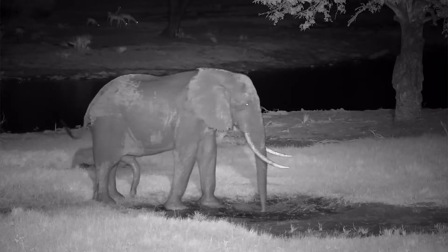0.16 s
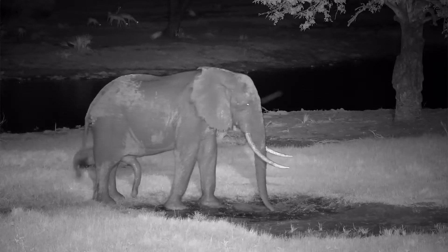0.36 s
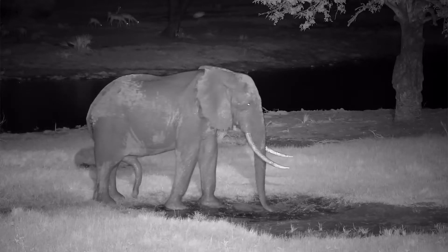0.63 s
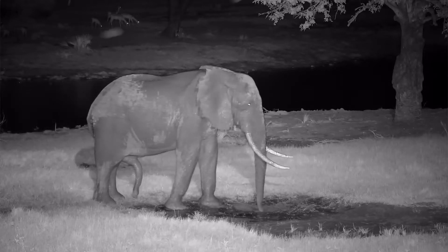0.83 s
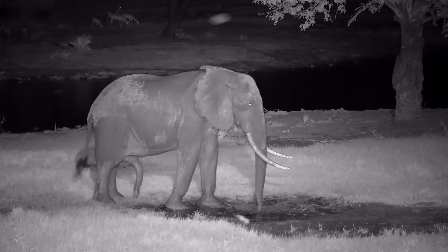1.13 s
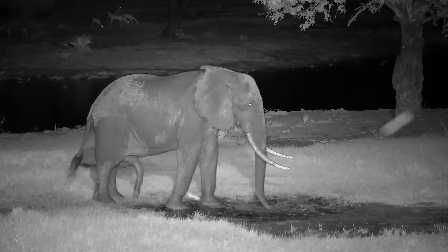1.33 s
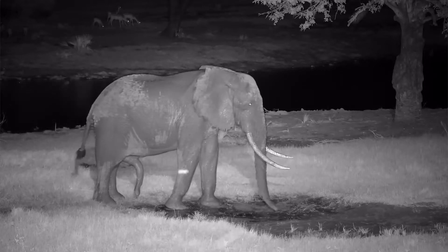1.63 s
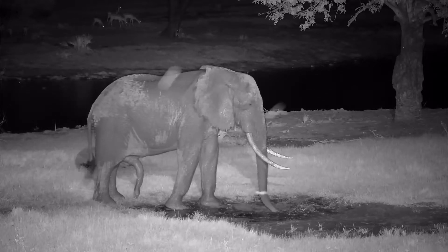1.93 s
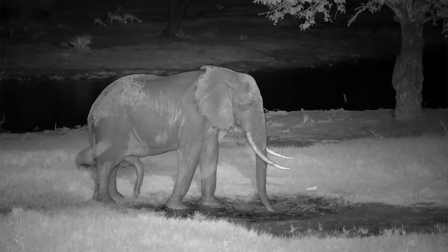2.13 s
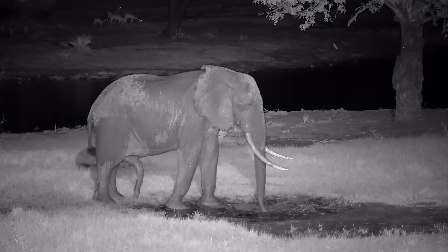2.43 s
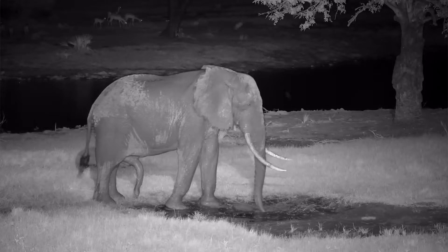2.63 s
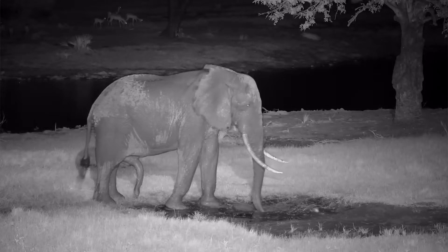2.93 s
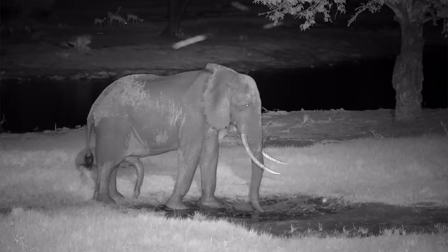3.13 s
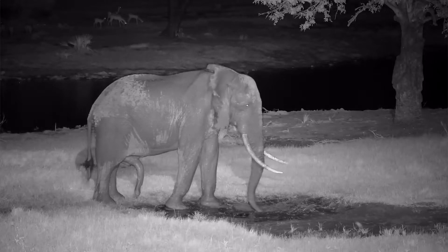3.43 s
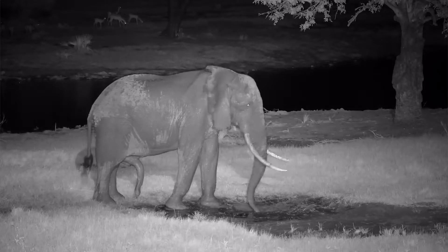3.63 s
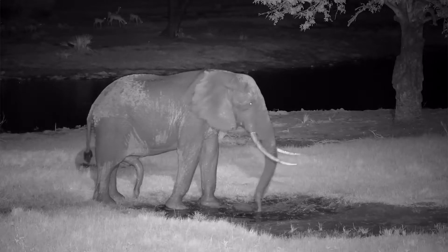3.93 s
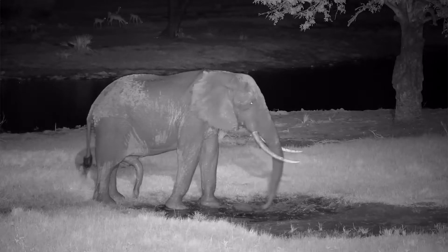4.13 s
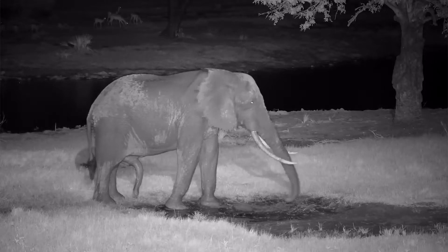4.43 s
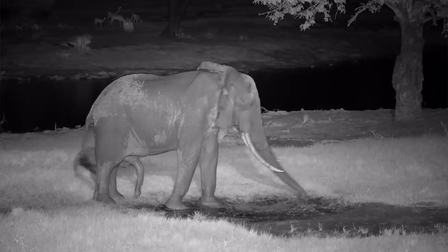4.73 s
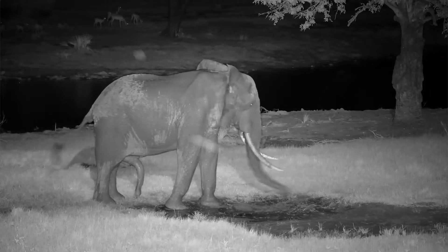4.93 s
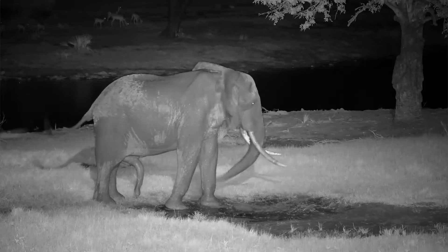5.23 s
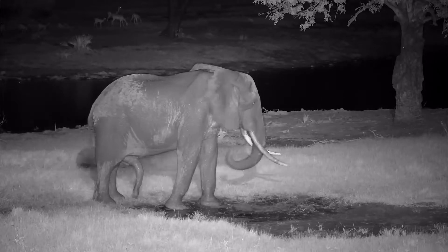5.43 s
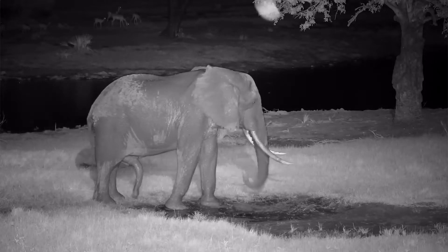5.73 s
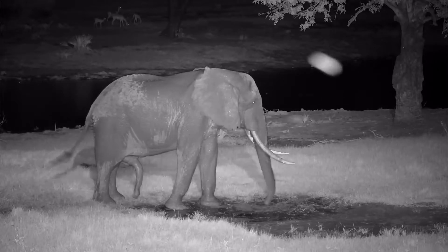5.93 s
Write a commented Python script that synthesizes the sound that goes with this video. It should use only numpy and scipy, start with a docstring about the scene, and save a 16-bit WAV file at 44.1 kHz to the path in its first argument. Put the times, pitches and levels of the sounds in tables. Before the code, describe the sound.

Outdoors at night by a waterhole, a thick frog chorus runs without pause. Near bubbling frogs pop in rapid, throbbing upward boips, mixed with slower smooth slides, sharp ringing ticks and a short pure rising whistle nearly every second. Soft toad trills come and go. Distant frogs and crickets shimmer above. An elephant's quiet fluttering breaths pass underneath, with a small dull knock late. Thin bass; the loudest overlaps clip.

```python
"""Frog chorus at a night waterhole

A warm night at the water's edge. Bubbling frogs pop throbbing, rising 'boips' and slower smooth slides;
reed frogs whistle and tick in sine notes; toads trill in trains of soft pulses. Crowds of short notes make
far frogs, with crickets above them, and shaped noise makes the night air. A large animal nearby blows and
snuffles in fluttering noise, with one dull knock. The loudest overlaps clip."""
import sys
import numpy as np
from scipy import signal
from scipy.fft import rfft, irfft
from scipy.io import wavfile

SR = 44100
rng = np.random.default_rng(int(sys.argv[2]) if len(sys.argv) > 2 else 0)


def boost_factor(decibels):
    """Convert a level in decibels to a linear amplitude factor."""
    exponent = np.asarray(decibels, float) / 20
    return 10 ** exponent


def wav_out(sig):
    """Save sig, one row per channel (or a flat mono array), as 16-bit PCM at SR to the path in sys.argv[1]."""
    wavfile.write(sys.argv[1], SR, np.round(np.clip(np.atleast_2d(sig).T, -1, 1) * 32767).astype(np.int16))


N = 268128
T = np.arange(N) / SR  # time [s]

# Colour of the night air: (frequency [Hz], relative level [dB])
NIGHT_COLOUR = [(100, -60.5), (400, -29), (700, -20), (1100, -6.5), (2200, -6), (3200, 2), (4500, -15),
                (5700, -0.5), (6800, -21), (7600, -33), (8200, -38), (12300, -45.5), (12700, -95.5)]
# Slow swell of both choruses: (time [s], far frog level [dB], cricket level [dB])
CHORUS_SWELL = [(0, -25, -25), (.65, -27.5, -27), (1.1, -23.5, -25), (1.9, -26.5, -24), (2.5, -24, -23.5),
                (3.2, -23.5, -24.5), (3.8, -24, -23.5), (4.3, -24.5, -23), (4.75, -22, -23),
                (5.1, -24.5, -22.5), (5.35, -23.5, -24.5), (5.6, -25, -22.5), (6.08, -25, -25.5)]
# Loudness of far frog voices across their band: (frequency [Hz], relative level [dB])
FAR_FROG_BAND = [(2550, -30), (2800, -4), (3150, -1), (3500, -2), (3900, -13.5), (4300, -16)]
# Loudness of crickets across their band: (frequency [Hz], relative level [dB])
CRICKET_BAND = [(4900, -6), (5200, -7), (5600, 2.5), (6100, 0), (6500, -8.5), (7000, -21), (7600, -21.5)]
# How fast a crowd's loudness wanders: (rate [Hz], relative level [dB])
WAVER_COLOUR = [(2, 9.5), (8, 12.5), (18, 5.5), (40, -39.5), (120, -110)]
# Toad trills: (first pulse [s], last pulse [s], pulses [count])
TOAD_TRILLS = [(.02, .725, 26), (1.237, 2.29, 41), (2.09, 3.021, 38), (4.756, 5.702, 36)]
# The voice of each trill: (pitch [Hz], start level [dB], end level [dB])
TOAD_VOICES = [(1082, -23, -31), (1110, -30.5, -29.5), (1032, -32, -32), (1094, -23, -22)]
# Near bubbling frogs: (time near 1500 Hz [s], level [dB], rise [Hz/s])
NEAR_BOIPS = [(.143, -17, 78400), (.193, -20.5, 76500), (.233, -13.5, 85000), (.247, -20.5, 85500),
              (.262, -10, 86700), (.463, -16, 58200), (.543, -22, 71300), (.553, -14.5, 82600),
              (.64, -28.5, 70400), (.835, -34.5, 70000), (.873, -14.5, 85000), (.925, -16, 79000),
              (.955, -22, 86500), (.973, -36, 87000), (.981, -7, 86400), (.995, -10.5, 89700),
              (1.087, -21, 87500), (1.096, -21, 83000), (1.181, -11, 72000), (1.192, -24.5, 67000),
              (1.315, -30.5, 71000), (1.493, -19.5, 70000), (1.525, -16.5, 89000), (1.573, -18, 74000),
              (1.622, -15.5, 90500), (1.652, -17.5, 84000), (1.786, -21, 58300), (1.795, -9, 62600),
              (1.818, -12.5, 93000), (1.829, -15, 84400), (1.943, -18, 69000), (1.965, -23, 86000),
              (1.98, -15.5, 90000), (2.028, -24.5, 80500), (2.11, -27.5, 69000), (2.14, -30, 68600),
              (2.228, -17.5, 72500), (2.235, -27.5, 70500), (2.395, -15.5, 88500), (2.407, -20, 84500),
              (2.418, -13.5, 82300), (2.43, -15.5, 63400), (2.496, -25.5, 85500), (2.511, -24, 81500),
              (2.523, -19, 78500), (2.568, -18.5, 53100), (2.58, -26.5, 76000), (2.62, -26.5, 71500),
              (2.765, -22.5, 64800), (2.92, -17, 70000), (2.948, -11.5, 84200), (3.109, -27, 69000),
              (3.136, -17, 68700), (3.15, -15.5, 79500), (3.218, -16, 86000), (3.277, -31.5, 70400),
              (3.316, -27, 68000), (3.369, -15, 75600), (3.453, -18, 87600), (3.481, -9, 80000),
              (3.608, -20, 85500), (3.692, -24, 87000), (3.73, -19, 66000), (3.806, -23, 86000),
              (3.814, -19, 85400), (3.946, -22.5, 84500), (3.989, -17, 68700), (4, -18, 81000),
              (4.009, -13, 91000), (4.095, -23, 91000), (4.155, -28.5, 67500), (4.205, -18.5, 83000),
              (4.227, -15.5, 89000), (4.285, -16.5, 75000), (4.341, -17, 88000), (4.452, -25.5, 69000),
              (4.495, -10.5, 92000), (4.529, -14, 85000), (4.553, -24.5, 86000), (4.594, -17.5, 87000),
              (4.653, -21.5, 91000), (4.774, -17, 75400), (4.81, -13, 80700), (4.831, -22, 56300),
              (4.899, -16.5, 79000), (4.975, -16.5, 87500), (4.985, -28, 86500), (5.121, -13, 77700),
              (5.187, -20.5, 86500), (5.2, -25, 76000), (5.214, -18.5, 86500), (5.241, -43, 85000),
              (5.252, -16, 85000), (5.403, -21.5, 79000), (5.412, -18, 77600), (5.483, -21.5, 88000),
              (5.617, -14, 84000), (5.686, -17, 89000), (5.711, -23, 74600), (5.73, -14, 85000),
              (5.853, -20.5, 67000), (5.987, -15, 88000), (6.037, -13.5, 84000), (6.053, -18.5, 85000)]
# Resonance of the sac in a boip: (frequency [Hz], gain [dB])
BOIP_RESONANCE = [(780, -2.5), (900, -8), (1300, -3), (1600, 0.5), (2100, 2), (2400, -3.5), (2800, -4.5)]
# Slower clean slides: (time near 1500 Hz [s], level [dB], rise [Hz/s])
SLIDE_CALLS = [(.031, -26, 20700), (.28, -17, 24350), (.38, -21.5, 24700), (1.407, -17.5, 25200),
               (1.768, -22, 24400), (2.863, -31.5, 22700), (3.079, -23.5, 18960), (3.19, -18, 24500),
               (3.514, -20, 27300), (4.034, -19, 25000), (4.712, -23, 26000), (5.048, -18.5, 24700),
               (5.165, -29, 21100), (5.51, -28.5, 25500), (5.584, -25, 25400), (5.83, -23, 23400)]
# Resonance of the sac in a slide: (frequency [Hz], gain [dB])
SLIDE_RESONANCE = [(850, -9.5), (1100, -6), (1300, -13.5), (1550, 2), (1900, -8), (2200, 0)]
# Reed frog ticks: (time [s], level [dB], pitch [Hz])
REED_TICKS = [(0.103, -9.5, 2700), (0.523, -18, 2840), (1.3836, -14, 2740), (1.4037, -9, 2710),
              (1.43, -13, 2656), (1.721, -19, 2790), (1.833, -5, 2797), (2.218, -20, 2680),
              (2.3506, -20, 2660), (2.9632, -11.5, 2790), (3.3897, -11, 2710), (3.6197, -20, 2720),
              (3.8387, -14.5, 2713), (4.1757, -16, 2690), (4.661, -13, 2770), (4.7646, -16, 2860),
              (4.822, -11.5, 2750), (4.901, -12.5, 2740), (5.2776, -16.5, 2820), (5.455, -14, 2740),
              (5.5428, -17.5, 2660), (5.679, -12.5, 2670)]
# Reed frog whistles: (time [s], level [dB], length [s])
REED_WHISTLES = [(0.2, -10.5, 0.077), (1.003, -8.5, 0.071), (1.872, -9.5, 0.068), (2.814, -10.5, 0.066),
                 (3.671, -6, 0.07), (4.429, -6.5, 0.064), (5.135, -9, 0.068)]
# The animal's blows and snuffles: (time [s], level [dB], attack [s], hold [s], fade [dB/s])
BLOWS = [(0.997, -40.5, 0.096, 0.037, 43), (2.1, -41.5, 0.58, .15, 35), (3.388, -36.5, 0.035, 0.6, 198),
         (3.551, -35.5, 0.069, 0.028, 149), (3.76, -35, .08, 0.053, 120), (5.312, -39, 0.057, .05, 86),
         (5.52, -48, .08, 0.1, 86)]
# Colour of the animal's breath: (frequency [Hz], relative level [dB])
BREATH_COLOUR = [(120, -61), (250, -24), (400, -15), (500, 1), (650, -2.5), (850, 5.5), (1100, -1),
                 (1800, -6.5), (4000, -47.5), (9000, -51.5), (12300, -55.5), (13000, -110)]
# The dull knock: (level [dB], pitch [Hz], 60 dB decay [s])
DULL_KNOCK = (-24, 800, .012)


def shape(hz, table):
    """Gain of a (frequency [Hz], level [dB]) table, joined on a log frequency axis."""
    f, db = np.transpose(table)
    return boost_factor(np.interp(np.log(np.maximum(hz, 1)), np.log(f), db))


def noise(table):
    """Noise of rms 1 with the given colour."""
    spectrum = rfft(rng.standard_normal(N))
    x = irfft(spectrum * shape(np.fft.rfftfreq(N, 1 / SR), table), N)
    return x / x.std()


def notes(start, hz, envelope):
    """Mixes many short sine notes; one row of pitch and envelope for each."""
    phase = 2 * np.pi * (np.cumsum(hz, axis=1) / SR + rng.random((len(start), 1)))
    at = (np.asarray(start) * SR).astype(int)[:, None] + np.arange(envelope.shape[1])
    inside = (at >= 0) & (at < N)
    return np.bincount(at[inside], (envelope * np.sin(phase))[inside], N)


def throb(t, hz, depth, spread):
    """Pulsing loudness, as of vocal cords opening in bursts; each note has its own rate."""
    chance = rng.random((len(t), 2))
    rate = hz * (1 + spread * (chance[:, :1] - .5))
    return 1 + np.clip(depth, 0, 1) * np.cos(2 * np.pi * (rate * t + chance[:, 1:]))


def scattered(x, echo_db):
    """The sound and its short blur from reeds and banks; a fresh random echo on each use."""
    t60_s = 0.045
    t = np.arange(int(.3 * SR)) / SR
    tail = rng.standard_normal(len(t)) * np.exp(-np.log(1000) * t / t60_s) * (t > .002)
    return x + boost_factor(echo_db) * signal.fftconvolve(x, tail / np.linalg.norm(tail))[:N]


def night_air():
    """A steady bed of shaped noise under the callers."""
    return boost_factor(-30) * noise(NIGHT_COLOUR)


def crowd(table, length, glide, pulse_hz, depth, scatter_db, count):
    """Many unseen callers: short pulsed notes at random moments, pitches spread over the band; rms 1."""
    chance = rng.random((count, 3))  # moment, pitch and loudness of each note
    lo, hi = table[0][0], table[-1][0]
    u = np.arange(0, length, 1 / SR) / length + 0 * chance[:, :1]
    hz = (lo + (hi - lo) * chance[:, 1:2]) * (1 + glide * (u - .5))
    size = boost_factor(scatter_db * chance[:, 2:3])
    envelope = size * shape(hz, table) * np.sin(np.pi * u) * throb(u * length, pulse_hz, depth, 0.32)
    x = notes(chance[:, 0] * (N / SR + length) - length, hz, envelope)
    return x / x.std()


def choruses():
    """Far frogs and crickets: each crowd swells slowly and wavers; the crickets also pulse to a shared beat."""
    beat_hz, beat_peak_s, beat_depth_db = 5.95, 2.0, 1
    frog_waver_db, cricket_waver_db = 1.5, 1.5  # rms
    s, frog_db, cricket_db = np.transpose(CHORUS_SWELL)
    far = crowd(FAR_FROG_BAND, .011, .06, 240, .7, 6., count=7000)
    crickets = crowd(CRICKET_BAND, .009, .02, 400, .7, 6., count=8000)
    beat_db = beat_depth_db * np.cos(2 * np.pi * beat_hz * (T - beat_peak_s))
    far_level_db = np.interp(T, s, frog_db) + frog_waver_db * noise(WAVER_COLOUR)
    cricket_level_db = np.interp(T, s, cricket_db) + beat_db + cricket_waver_db * noise(WAVER_COLOUR)
    return boost_factor(far_level_db) * far + boost_factor(cricket_level_db) * crickets


def toads():
    """Even trains of soft round pulses that settle up onto one pitch."""
    start_flat, wobble = 0.046, .006  # share of pitch: below the note at first, and pulse to pulse
    out, t = 0, np.arange(int(.04 * SR)) / SR
    pulse = np.exp(-.5 * ((t - t.mean()) / 0.0053) ** 2)
    for (first, last, pulses), (pitch_hz, start_db, end_db) in zip(TOAD_TRILLS, TOAD_VOICES):
        chance = rng.standard_normal((pulses, 2))
        index = np.arange(pulses)[:, None]
        db = np.linspace(start_db, end_db, pulses)[:, None] + 1.2 * chance[:, :1]
        db = db - 9 * np.exp(-index / 2.1)  # the trill swells over its first pulses
        hz = pitch_hz * (1 - start_flat * np.exp(-index / 4.5) + wobble * chance[:, 1:])
        out = out + notes(np.linspace(first, last, pulses) - t.mean(), hz + 0 * t, boost_factor(db) * pulse)
    return out


def sweeps(rows, low_hz, top_hz, tilt_db, sac, knees, lead, linger, pulse_depth, overtone_db):
    """An S-shaped rise: a pure note at the bottom, a throbbing climb, a fading plateau under the top."""
    s, db, rise = (np.array(rows)[:, [k]] for k in range(3))
    t = np.arange(-int(.06 * SR), int(.08 * SR)) / SR + 0 * s
    half, mid = (top_hz - low_hz) / 2, (top_hz + low_hz) / 2
    u = (1500 - mid + rise * t) / half
    knee = np.where(u < 0, *knees)  # one bend for the foot, one for the top; higher turns more sharply
    height = u / (1 + np.abs(u) ** knee) ** (1 / knee)
    hz = mid + half * height
    depth = pulse_depth * np.clip((hz - low_hz) / 400, 0, 1) * (0.5 + 0.52 * rng.random(s.shape))
    window = np.where(u < 0, np.exp(-np.abs(u / lead) ** 3.26), np.exp(-(u / linger) ** 4))
    pulses = throb(t, 241.0, depth, .1) ** 1.16 / 1.25
    envelope = boost_factor(db + tilt_db * height) * shape(hz, sac) * window * pulses
    start = s[:, 0] + t[:, 0]
    return notes(start, hz, envelope) + notes(start, 2 * hz, envelope * boost_factor(overtone_db))


def bubbling_frogs():
    """Fast throbbing boips, near and far, and slow smooth slides, from deep in several clumps of grass."""
    patches, echo_db = 6, -1  # clumps of grass, each with its own echo
    low_hz, top_hz, top_spread_hz, bright_spread_db = 775, 2634, 130, 2  # spreads vary call to call
    far_db, far_range_db = -41, 9  # faintest far call, and the span above it
    far = rng.random((70, 3)) * [N / SR, far_range_db, 35000] + [0, far_db, 45000]
    rows, out = np.vstack([NEAR_BOIPS, far]), 0
    for k in range(patches):
        calls = rows[k::patches]
        chance = rng.standard_normal((len(calls), 2))
        call_top_hz = top_hz + top_spread_hz * chance[:, :1]
        boips = sweeps(calls, low_hz, call_top_hz, bright_spread_db * chance[:, 1:], BOIP_RESONANCE,
                       knees=(6.0, 2.6), lead=1.404, linger=2.17, pulse_depth=0.74, overtone_db=-19.5)
        slides = sweeps(SLIDE_CALLS[k::patches], 830, 2200, 0, SLIDE_RESONANCE,
                        knees=(4.0, 3.0), lead=1.41, linger=1.3, pulse_depth=.05, overtone_db=-27.5)
        out = out + scattered(boips + slides, echo_db)
    return out


def reed_frogs():
    """Pure rising whistles, and ticks that ring the same sac."""
    whistle_hz, rise_hz_per_s = 2613, 5280
    t = np.arange(int(.09 * SR)) / SR
    s, db, length = np.transpose(REED_WHISTLES)[:, :, None]
    u = np.minimum(t / length, 1)
    envelope = boost_factor(db) * np.sin(np.pi * u ** 0.84) ** 0.69 * (u < 1)
    whistles = notes(s[:, 0], whistle_hz + rise_hz_per_s * length * u, envelope)
    s, db, hz = np.transpose(REED_TICKS)[:, :, None]
    ring = (1 - np.exp(-(t / 0.00033) ** 2)) * np.exp(-t / 0.014)
    return whistles + notes(s[:, 0] - .001, hz + 0 * t, boost_factor(db) * ring)


def animal():
    """Air fluttering through a long trunk, and one dull knock, a quickly dying sine."""
    s, db, attack, hold, fade = np.transpose(BLOWS)[:, :, None]
    fall_db = fade * np.maximum(T - s - attack - hold, 0)
    blows = np.clip((T - s) / attack, 0, 1) * boost_factor(db - fall_db)
    flutter_db = 2.4 * noise([(2, -7), (12, 1.5), (40, -4), (80, -44.5), (300, -110)])
    breath = blows.sum(axis=0) * boost_factor(flutter_db) * noise(BREATH_COLOUR)
    knock_db, hz, t60 = DULL_KNOCK
    t = np.maximum(T - 5.277, 0)  # time since the knock [s]
    ring = np.exp(-np.log(1000) * t / t60) * (1 - np.exp(-t / 0.0004))
    return breath + boost_factor(knock_db) * np.sin(2 * np.pi * hz * t) * ring


def scene():
    """All callers, smeared by reeds and banks, with the animal and the night air left dry."""
    others = scattered(choruses() + toads() + reed_frogs(), -14.5)
    return (night_air() + others + bubbling_frogs() + animal())[None]


def top_cut(x):
    """Nothing passes above the cut-off."""
    return signal.sosfilt(signal.butter(12, 15800, fs=SR, output="sos"), x)


def record(dry):
    """The microphone drops the bass, then the input stage clips flat."""
    clip = .715  # share of full scale
    thin = signal.sosfilt(signal.butter(3, 170, "high", fs=SR, output="sos"), dry)
    mix = np.clip(thin, -clip, clip)
    return top_cut(mix)


dry = scene()
out = record(dry)
wav_out(out)
```